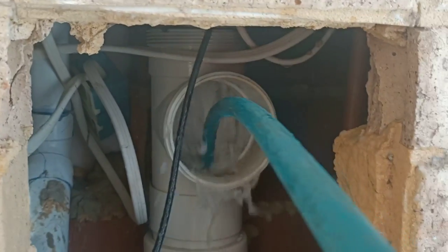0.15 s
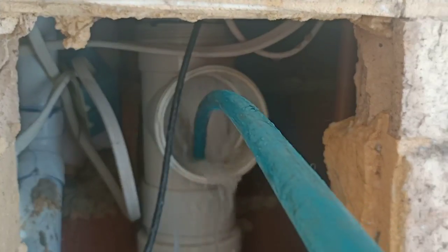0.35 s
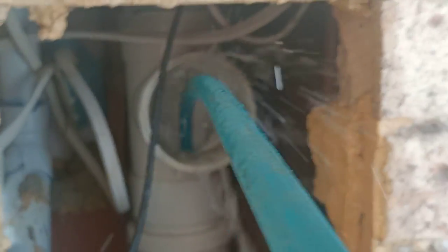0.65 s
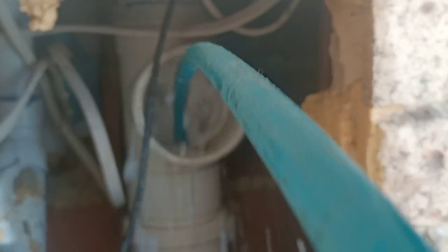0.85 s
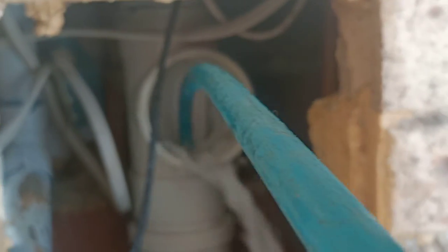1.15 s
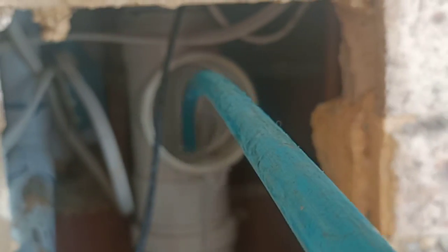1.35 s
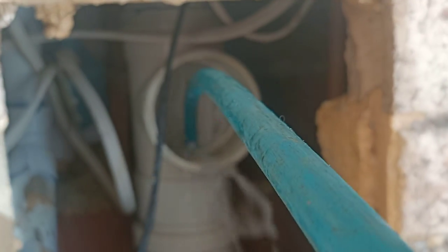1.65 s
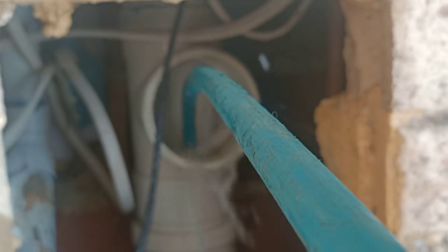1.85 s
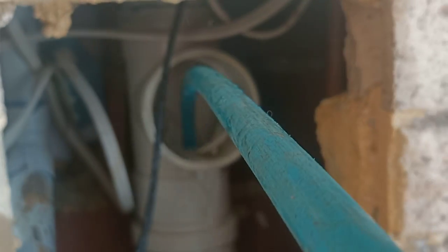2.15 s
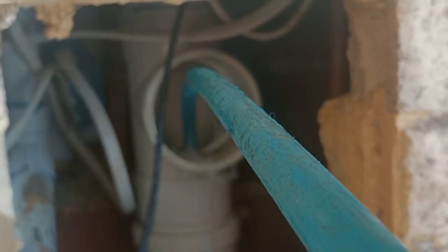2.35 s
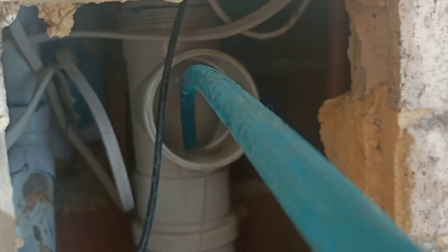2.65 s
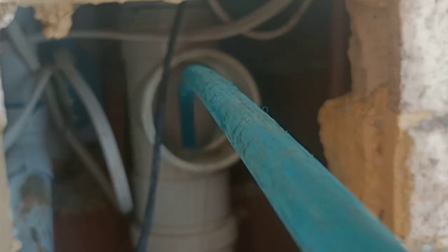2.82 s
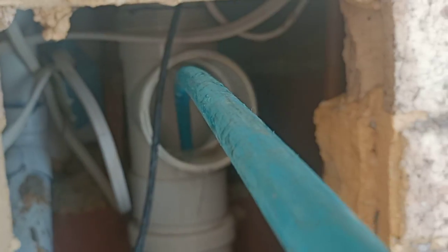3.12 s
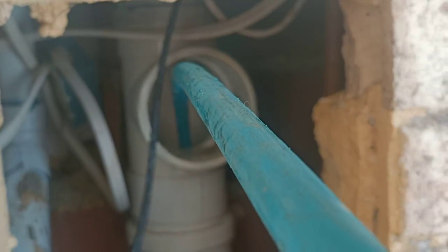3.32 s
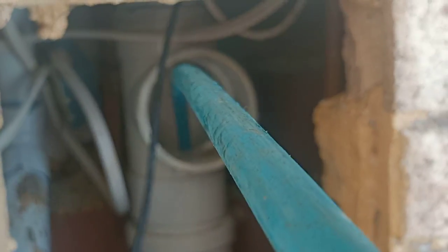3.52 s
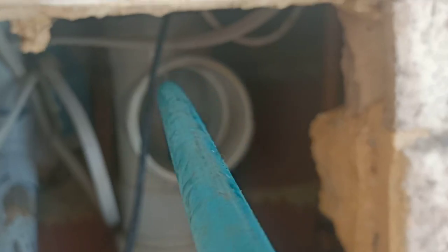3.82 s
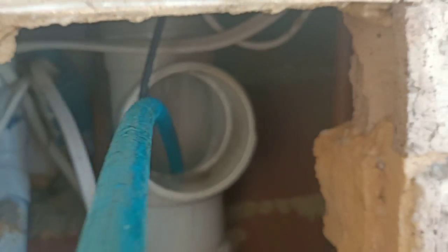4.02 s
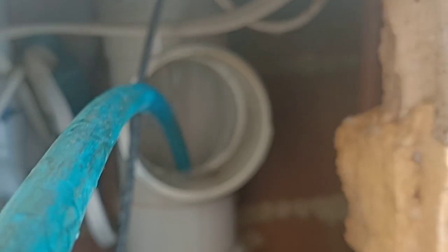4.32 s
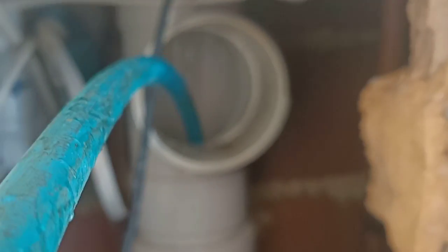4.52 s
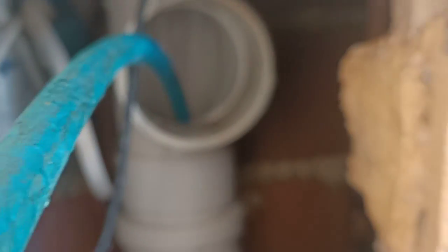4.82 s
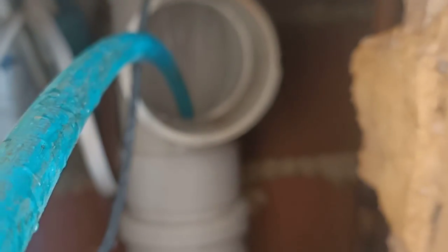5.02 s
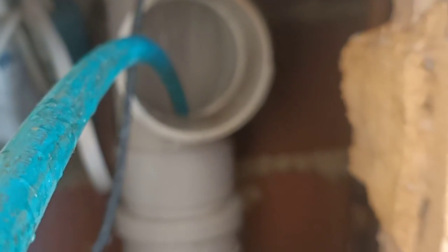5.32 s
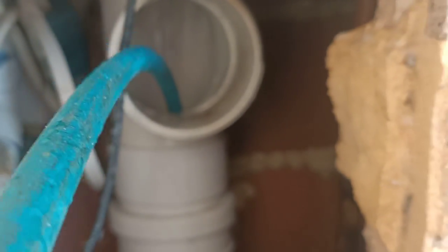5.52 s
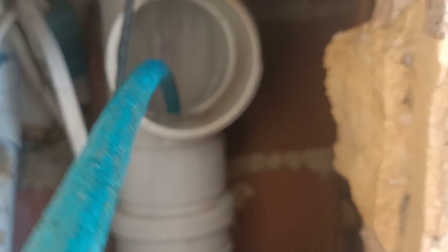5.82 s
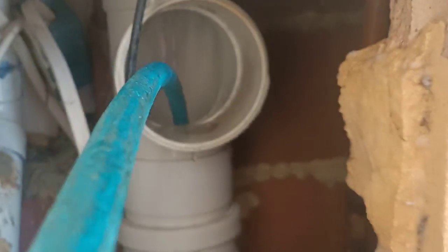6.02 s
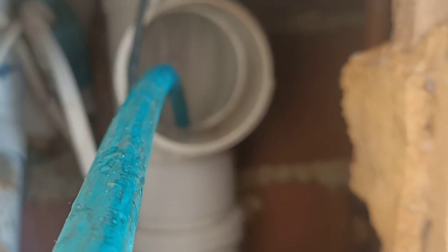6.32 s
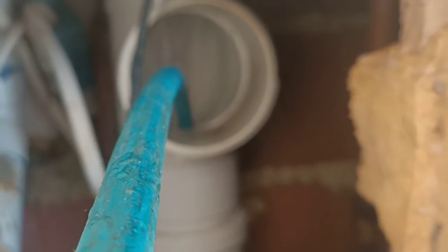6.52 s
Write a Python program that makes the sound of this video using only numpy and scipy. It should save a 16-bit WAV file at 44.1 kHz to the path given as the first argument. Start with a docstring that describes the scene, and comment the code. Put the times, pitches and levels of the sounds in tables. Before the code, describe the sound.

Heard close in stereo inside a cramped wall hatch, with dense short echoes. From 0 s, water gushes loudly from an open plastic pipe, hollow and ringing, with rapid bubbles, rising glugs, low slopping thuds and crisp spray; a strong burst comes near 1.1 s. From about 1.5 s it weakens, breaking into a thin sputtering trickle by 3 s. From 3.2 to 4.4 s only faint drips, ticks and small hose knocks remain over a distant low pump hum and room noise; a sharper knock and tick land at 4.07 s. From 4.4 to 5 s the wet hose rubs and scuffs grainily on the rim. At 5.05 s trapped air abruptly blasts out, a bright strong hiss with a breathy whistle sweeping upward around 5.4 s, then easing by 5.7 s. Water surges back from 5.6 s with a thud at 5.77 s, full and gurgling by 6 s, still running at the end, about 6.65 s.

```python
"""Jetting hose in a drain pipe

Inside a wall hatch, gushing water (filtered noise and ringing bubbles) dies away to drips in an open plastic pipe.
The hose knocks (damped rings) and rubs on the rim (grainy noise); trapped air blasts out as hiss with a whistle
(noise on a gliding pitch), then the water surges back. A far pump engine hums below (wavering sines) over room
noise. Two microphone ports hear it all, with close echoes and the ring of the hatch."""
import sys
import numpy as np
from scipy import signal
from scipy.fft import rfft, irfft
from scipy.io import wavfile

SR = 44100
rng = np.random.default_rng(int(sys.argv[2]) if len(sys.argv) > 2 else 0)


def nominal_scale(level):
    """Amplitude ratio for a level in decibels (scalar or array-like)."""
    x = np.asarray(level, float) / 20
    return 10 ** x


def inscribe(sig):
    """Save sig as 16-bit PCM at rate SR to the path in sys.argv[1].

    A 1-D sig is mono; a 2-D sig holds one channel per row.
    Samples are clipped to [-1, 1] before scaling.
    """
    pcm = np.round(np.clip(np.atleast_2d(sig).T, -1, 1) * 32767)
    wavfile.write(sys.argv[1], SR, pcm.astype(np.int16))


N = 293706

# likeness of the ports for rubbing and background: (frequency [Hz], left-right likeness, below 0 taken as 0)
FAR_LIKENESS = [(60, 0.85), (240, 0.83), (950, -0.74), (3750, 0.11), (14900, -0.1)]


def rms_one(x):
    """Scale to rms 1."""
    return x / np.sqrt(np.mean(x ** 2) + 1e-20)


def in_time(rows):
    """Sample span of a table and its columns over that span."""
    s, *columns = np.transpose(rows)
    span = slice(round(s[0] * SR), min(round(s[-1] * SR), N))
    return [span] + [np.interp(np.arange(N)[span] / SR, s, column) for column in columns]


def at_hz(points, hz):
    """Read a spectrum on a log-frequency axis."""
    point_hz, values = np.array(points).T
    return np.interp(np.log(hz), np.log(point_hz), values)


def left_right(pan_db):
    """Gains of the two ports; positive favours the left."""
    return nominal_scale(pan_db * np.array([[.5], [-.5]]))


def drift(rate, size):
    """Slow random wander of spread 1: noise through two equal low-pass poles at rate [Hz]."""
    r = np.exp(-80 * np.pi * rate / SR)   # computed at every 40th sample
    noise = rng.standard_normal(size // 40 + 1002)
    slow = signal.lfilter([1], [1, -2 * r, r * r], noise)[1000:]
    return np.interp(np.arange(size) / 40, np.arange(len(slow)), rms_one(slow - slow.mean()))


def pair(size, alike):
    """Two noises that share a part: alike 0 is independent, 1 identical."""
    mid, side = rng.standard_normal((2, size))
    alike = np.clip(alike, 0, 1)
    return np.sqrt(1 + alike) * mid + np.sqrt(1 - alike) * side * [[1], [-1]]


def band_pass(x, edges_hz):
    """Keep the noise between two frequencies."""
    return signal.sosfilt(signal.butter(2, edges_hz, "band", fs=SR, output="sos"), x)


def above(x, edge_hz):
    """Steep high-pass."""
    return signal.sosfilt(signal.butter(6, edge_hz, "high", fs=SR, output="sos"), x)


def bands(spectrum, likeness, size, patchy_db, rate, tilt_db=0):
    """About third-octave bands of stereo noise, flickering together and alone; tilt in dB per octave; rms 1."""
    low, high = spectrum[0][0], spectrum[-1][0]
    edges = np.geomspace(low, high, int(3 * np.log2(high / low)) + 2)
    out, together = 0, drift(rate, size)
    for a, b in zip(edges, edges[1:]):
        hz = np.sqrt(a * b)
        band = band_pass(pair(size, at_hz(likeness, hz)), [a, b])
        level_db = at_hz(spectrum, hz) + patchy_db * (0.63 * together + 0.8 * drift(rate, size))
        out = out + band * nominal_scale(level_db + tilt_db * np.log2(hz / np.sqrt(low * high)))
    return rms_one(out)


def resonances(modes, likeness, size, patchy_db, rate, fall_db=0):
    """Noise sung through each resonance, each swelling on its own; a falling flow shifts their balance; rms 1."""
    out, power = 0, 0
    for hz, width, level_db, *gain in modes:
        r = np.exp(-np.pi * width / SR)
        poles = [1, -2 * r * np.cos(2 * np.pi * hz / SR), r * r]
        sung = signal.lfilter([1 - r, 0, r - 1], poles, pair(size, at_hz(likeness, hz)))
        strength = nominal_scale(level_db + sum(gain) * fall_db)
        out = out + sung * strength * nominal_scale(patchy_db * drift(rate, size))
        power = power + width * strength ** 2
    return rms_one(out / np.sqrt(power))


def bubbles(per_s, low_hz, high_hz, cycles, size, spread_db):
    """Random bubbles, each a little to one side, dying by 60 dB in the given cycles; rms 1."""
    out = np.zeros((2, size))
    born = rng.random(size) < per_s * nominal_scale(4.0 * drift(12.0, size)) / SR   # they come in clusters
    strength_db = spread_db * np.minimum(rng.exponential(1, size), 4)
    kicks = born * nominal_scale(strength_db) * rng.choice([-1, 1], size)
    sides = nominal_scale(2.46 * rng.standard_normal(size) * [[1], [-1]])
    dealt = rng.integers(0, 14, size)   # which of 14 pitches each bubble takes
    for k, hz in enumerate(np.geomspace(low_hz, high_hz, num=14)):
        r, w = nominal_scale(-60 * hz / (cycles * SR)), 2 * np.pi * hz / SR
        chosen = kicks * sides * (dealt == k) + 1e-18
        out += signal.lfilter([0, np.sin(w)], [1, -2 * r * np.cos(w), r * r], chosen)
    return rms_one(out)


def swells(rows, span, rise_s, fall_s):
    """Each event lifts a level by its dB, rising to its moment and falling after it."""
    s, *lifts = np.transpose(rows)
    after = np.arange(N)[span][::32, None] / SR - s
    shape = np.exp(-.5 * (after / np.where(after < 0, rise_s, fall_s)) ** 2)
    return [np.repeat(shape @ lift, 32)[:span.stop - span.start] for lift in lifts]


def add(out, s, peak_db, hz, t60, pan_db, attack_s, rise=0):
    """Add one damped ring; over its t60 its pitch climbs by twice the share rise."""
    t = np.arange(int(abs(t60) * SR)) / SR
    shape = nominal_scale(-60 * t / t60) * (1 - np.exp(-t / attack_s))
    ring = shape / shape.max() * np.sin(2 * np.pi * hz * (t + rise * t * t / t60))
    at = round(s * SR)
    out[:, at:at + len(t)] += (ring * nominal_scale(peak_db) * left_right(pan_db))[:, :N - at]


def ports(x, lead):
    """Sound reaches the two ports by different paths: the phase between them varies with pitch."""
    turn = np.interp(np.arange(N // 2 + 1) * SR / N, *np.transpose(lead))
    return irfft(rfft(x) * np.exp(.5j * turn * [[1], [-1]]), N)


def water(rows, gush_colour, gurgle_colour, spray_colour, pipe, rumble_db):
    """Turbulent gush through the pipe's air column, with bubbles, gurgle, wall rumble and fine spray."""
    # likeness of the ports for water: (frequency [Hz], left-right likeness)
    likeness = [(60, 1), (180, 1), (540, 0.99), (1000, 0.82), (1600, 0.72), (2800, 0.78), (4940, 0.4),
                (14900, .4)]
    # slugs of water bursting past the hose: (time [s], gush swell [dB])
    slugs = [(0.015, 3), (0.14, 3.5), (0.42, 2.5), (0.59, 3), (0.65, 3), (0.76, 1.5), (0.87, 2), (0.92, 0),
             (1.092, 8.5), (1.15, 4), (1.255, 4.5), (1.315, 6), (1.54, -0.5), (1.99, -1.5), (2.23, 4.5),
             (2.85, 3.5), (2.89, 4.5), (2.94, 2.5), (3.33, 4), (3.54, 4), (3.72, 0.5), (3.865, 3),
             (4.065, -4), (6.03, 2), (6.09, 2), (6.17, 1.5), (6.25, 0.5), (6.62, 1)]
    # water slopping against the pipe wall: (time [s], gurgle swell [dB], further rumble swell [dB])
    slops = [(0.06, -2.5, -8), (0.27, -2, 9), (0.35, 4.5, 13.5), (0.52, -7, -0.5), (0.56, 7.5, 12.5),
             (0.68, -3, 4), (0.78, 5, 3), (0.86, -1, 2), (0.93, -9, 9), (1.0, 2, 6), (1.07, 0, 3),
             (1.27, 6.5, 3), (1.39, 8, -7), (1.55, 3, 2), (1.86, 6.5, 6), (2.0, -5, -3.5), (2.06, -7, -2),
             (2.24, 7, 2), (2.33, 5, 3), (2.48, 1.5, 4), (3.54, -3, -5), (3.68, 3, 24), (3.84, 0, 6),
             (5.77, 4.5, 15.5), (6.08, 2.5, -2), (6.18, 1.5, 7), (6.32, -2, 7), (6.63, 6, 18)]
    # sheets of spray thrown out of the mouth: (time [s], spray swell [dB])
    splashes = [(0.27, 4.5), (0.37, 7.5), (0.47, 5.5), (0.555, 7.5), (0.69, 4), (0.87, 4), (1.1, 2),
                (1.2, 1), (1.7, 0.5), (1.86, 0.5), (2.24, 4), (2.5, 1.5), (2.93, 3), (3.3, 5), (5.6, 4),
                (5.74, 6.5), (5.8, 4), (6.24, 3)]
    # low air-column modes that emerge as the pipe empties:
    # (frequency [Hz], width [Hz], relative level [dB], gain per fall of the flow [dB/dB])
    deep_pipe = [(261, 12, -14, 1.5), (346, 22, -7.5, 0.9), (366, 60, -14.5, -0.15), (468, 46, -16.5, 1),
                 (605, 80, -8, 0.5)]
    # colour of the wall rumble: (frequency [Hz], relative density [dB per Hz])
    rumble_colour = [(24, -45.5), (40, 9), (59, -18), (92, -0.5), (118, 11.5), (162, -10), (200, -36),
                     (260, -52), (440, -120)]

    span, flow_db, bright_db, low_db = in_time(rows)
    out, n = np.zeros((2, N)), len(flow_db)
    slug_db, = swells(slugs, span, rise_s=.008, fall_s=.04)
    slop_db, thud_db = swells(slops, span, rise_s=0.041, fall_s=0.022)
    splash_db, = swells(splashes, span, rise_s=0.036, fall_s=0.023)
    thin = np.clip((-49 - flow_db) / 8, 0, 1)   # a trickle below -49 dB breaks up
    sputter_db = 4 * thin * drift(20.0, n)
    gush_db = flow_db + slug_db + sputter_db
    bright_db = bright_db + 0.38 * splash_db
    spray_db = -23.5 + 0.65 * flow_db + splash_db + sputter_db   # spray follows part of the flow's swing
    fall_db = np.minimum(flow_db.max() - 10.0 - gush_db, 30)   # a thinner flow lets the air column sing

    tilt_db = 2.44 * (bright_db - bright_db.mean())
    gush = bands(gush_colour, likeness, n, patchy_db=3.0, rate=29.0, tilt_db=tilt_db)
    column = resonances(pipe, likeness, n, patchy_db=3.5, rate=17.0, fall_db=fall_db)
    gush += nominal_scale(-2.0 + 0.16 * fall_db) * column
    gush += nominal_scale(-17.5) * bubbles(250, 950, 3980, 48.0, n, spread_db=5.5)
    gush += nominal_scale(-14.5) * bubbles(700, 1500, 4600, 10.0, n, spread_db=4.5)   # spatter

    gurgle = bands(gurgle_colour, likeness, n, patchy_db=3.0, rate=22.0)
    deep = resonances(deep_pipe, likeness, n, patchy_db=-1.0, rate=3.9, fall_db=fall_db)
    gurgle += nominal_scale(-0.5 + 0.36 * fall_db) * deep

    rumble = bands(rumble_colour, likeness, n, patchy_db=1.0, rate=31.0, tilt_db=-0.12 * fall_db)
    rumble = above(rumble, 58)

    dulling_db = -.1 * np.maximum(fall_db, 0)   # spray dulls as the flow falls
    spray = bands(spray_colour, likeness, n, patchy_db=1.95, rate=28.0, tilt_db=dulling_db)
    spray += nominal_scale(-12) * bubbles(400, 5000, 13000, 1.9, n, spread_db=3.5)

    out[:, span] = (nominal_scale(gush_db) * rms_one(gush) + nominal_scale(low_db + slop_db) * rms_one(gurgle)
                    + nominal_scale(low_db + rumble_db + thud_db) * rumble + nominal_scale(spray_db) * rms_one(spray))
    return out


def draining_water():
    """The gush thins to a trickle, and the emptying pipe changes the balance of its resonances."""
    # course of the flow: (time [s], flow as gush level [dB], brightness [dB, about its mean], gurgle level [dB])
    course = [(0.0, -17.5, -7.5, -19.5), (0.12, -14.5, -3.5, -30.5), (0.3, -14.5, -3, -38.5),
              (0.55, -15, -3.5, -31), (0.9, -12.5, 0, -39.5), (1.08, -20, -2, -40),
              (1.22, -20.5, -4, -42.5), (1.45, -20, -5.5, -32), (1.7, -22.5, -4, -40.5),
              (2.05, -26.5, -4, -34), (2.3, -32, -4.5, -41), (2.52, -32.5, -2, -38.5),
              (2.77, -40, -1, -49.5), (2.92, -42, 0.5, -52), (3.16, -46, -2.5, -63.5),
              (3.45, -53.5, -2, -66.5), (3.8, -59, -2, -68.5), (4.1, -63.5, 1.5, -68),
              (4.38, -67.5, 3.5, -76.5)]
    # air column while draining:
    # (frequency [Hz], width [Hz], relative level [dB], gain per fall of the flow [dB/dB])
    pipe = [(955, 80, -7.5, -0.55), (1018, 22.6, 4, -0.3), (1240, 51, 3.5, -0.07), (1346, 87, -3.5, 0),
            (1780, 66, -2, -0.25), (2000, 75, -0.5, 0.12), (2580, 210, -4, -0.45), (2845, 71, 1, 0),
            (3230, 250, -20, 1.04), (3675, 140, -10, 0.4), (4125, 120, -11.5, 0.54)]
    # colours of gush, gurgle and spray: (frequency [Hz], relative density [dB per Hz])
    gush_colour = [(470, -44), (800, -17), (979, -2), (1140, -13.5), (1250, -0.5), (1560, -3), (2860, 2.5),
                   (3480, 3), (4800, -19), (6240, -50.5), (10600, -120)]
    gurgle_colour = [(120, -41), (210, -23.5), (409, 2), (441, -1), (548, 4.5), (850, -5.5), (1100, -32),
                     (1870, -120)]
    spray_colour = [(2710, -32), (4600, -6), (5090, -11), (6290, -4), (7350, -7), (8460, 1), (8990, -12.5),
                    (13400, -20.5), (15300, -19.5)]
    # phase by which the left port leads: (frequency [Hz], phase [rad])
    lead = [(0, 0), (690, 0.6), (1210, -0.5), (1980, 0.0), (3010, -0.2), (3700, -5.6), (4390, -5.7),
            (5170, -7.0), (6120, -11.6), (9730, -24.3), (10300, -25.1), (12600, -25.6), (14200, -31.3),
            (15100, -30.9)]
    return ports(water(course, gush_colour, gurgle_colour, spray_colour, pipe, rumble_db=-4.5), lead)


def background():
    """Far pump engine: its orders are sines wavering a little in level and phase, over room noise."""
    # engine orders: (frequency [Hz], level [dB rms])
    orders = [(48.4, -57.5), (72.6, -56.5)]
    # colour of the room noise: (frequency [Hz], relative density [dB per Hz])
    room_colour = [(15, -44), (25, -5.5), (69, -14.5), (147, -2), (273, -17), (455, -16), (718, -14.5),
                   (1050, -18), (4000, -22.5), (4830, -26.5), (8500, -30), (13100, -32.5), (15300, -60.5)]
    t = np.arange(N) / SR
    hum = 0
    for hz, level_db in orders:
        level = np.sqrt(2) * nominal_scale(level_db + 1.2 * drift(4.0, N))
        hum = hum + level * np.sin(2 * np.pi * hz * t + 0.69 * drift(0.97, N))
    return hum + nominal_scale(-54.5) * bands(room_colour, FAR_LIKENESS, N, patchy_db=-1.0, rate=6.0)


def glugs():
    """Large bubbles: damped rings that climb in pitch."""
    # large bubbles: (time [s], peak before a 6.5 dB cut [dB], starting pitch [Hz])
    large = [(0.0912, -8.5, 2520), (0.1294, -4.5, 962), (0.19, -6, 2790), (0.2462, -8, 1240),
             (0.2888, -3.5, 2690), (0.357, -5, 2786), (0.5782, -7, 1234), (0.6302, -3, 2370),
             (0.733, -8, 2750), (0.803, -11, 2760), (0.8703, -4.5, 2520), (0.9986, -12, 2990),
             (1.044, -12.5, 2530), (1.0929, 0.5, 2100), (1.158, -6, 1620), (1.2804, -18, 1260),
             (1.33, 0, 1240), (1.508, -23.5, 1240), (1.6, -14, 2370), (1.731, -17, 2730),
             (1.7811, -10.5, 1233)]
    out = np.zeros((2, N))
    for s, peak_db, hz in large:
        add(out, s, peak_db - 6.5, hz, t60=0.04, pan_db=1.2, attack_s=0.006, rise=0.088)
    return out


def ticks():
    """Droplets and ticks: short treble rings, with two higher ones on top."""
    # droplets and ticks: (time [s], peak [dB], pitch [Hz], peak of each top ring [dB], left over right [dB])
    drops = [(1.6992, -19, 8500, -26, 8.5), (1.8358, -25, 5770, -38, -4), (1.97, -33, 6560, -30, -2),
             (2.0964, -32, 6230, -47.5, 2.5), (2.7149, -25, 6190, -36.5, -13),
             (2.8438, -39.5, 5080, -52.5, -7.5), (3.1138, -43, 5660, -36, -4.0),
             (3.2726, -41, 6440, -52.5, 0.0), (3.716, -41, 5110, -65, -0.5), (3.796, -43, 8300, -56, 22),
             (4.0692, -24, 8700, -30.5, 15), (4.2026, -41, 8700, -49, 14.5),
             (4.527, -34, 6960, -53.5, -1.0), (4.5707, -31.5, 6230, -56.5, -14),
             (4.594, -35, 5560, -63.5, -5), (4.6926, -41.5, 6080, -51.5, 1.0),
             (4.7305, -36.5, 8870, -49, 15)]
    out = np.zeros((2, N))
    for s, peak_db, hz, top_db, pan_db in drops:
        add(out, s, peak_db, hz, .003, pan_db, attack_s=0.00022)
        add(out, s, top_db, 10500, .002, pan_db, attack_s=.0002)
        add(out, s, top_db, 13500, .002, -pan_db, attack_s=0.00015)   # leans to the other side
    return out


def drips():
    """Nine faint drips at random moments, each a very short treble ring."""
    out = np.zeros((2, N))
    for when, size, pitch, side in rng.random((9, 4)):
        s = np.interp(when, [0, 1], (3.2, 4.8))
        peak_db, hz, pan_db = -48 + 6 * (size - .5), 5500 + 3000 * pitch, 12 * (side - .5)
        add(out, s, peak_db, hz, .002, pan_db, attack_s=0.00027)
    return out


def knocks():
    """Hose knocking on the pipe: a low ring dying in six cycles, with a two-pitch crack."""
    # knocks: (time [s], peak [dB], pitch [Hz], peak of the lower crack [dB], left over right [dB])
    blows = [(3.462, -43, 270, -58, 5), (3.582, -44.5, 108, -65, 23), (3.672, -39.5, 172, -60, 22),
             (3.797, -42.5, 900, -59, 18), (4.0692, -29.5, 329, -33, -12), (4.31, -39.5, 520, -50, 14),
             (4.412, -42, 423, -53, 5), (4.641, -38, 493, -58, 14), (4.691, -33.5, 390, -57, -2),
             (5.77, -30, 192, -60, 2)]
    out = np.zeros((2, N))
    for s, peak_db, hz, crack_db, pan_db in blows:
        add(out, s, peak_db, hz, 6.0 / hz, pan_db, attack_s=0.00054)
        add(out, s, crack_db - 7, 4300, .004, pan_db, attack_s=.0003)
        add(out, s, crack_db, 1850, .007, pan_db, attack_s=0.00037)
    return out


def rubbing():
    """Wet hose dragged over the rim: grainy noise in clumps."""
    # course of the rub: (time [s], level [dB], treble [dB, about its mean])
    course = [(4.385, -46, -18), (4.553, -47, -7.5), (4.651, -45.5, -14.5), (4.837, -49.5, -8),
              (5.03, -64.5, -27.5)]
    # colour of the rub: (frequency [Hz], relative density [dB per Hz])
    colour = [(71, -29), (120, -9), (389, -3), (467, -20), (1550, -9.5), (1900, -17), (3090, -13),
              (5020, -30), (6280, -24.5), (15300, -43)]
    span, level_db, treble_db = in_time(course)
    out, n = np.zeros((2, N)), len(level_db)
    tilt_db = 0.34 * (treble_db - treble_db.mean())
    out[:, span] = nominal_scale(level_db) * bands(colour, FAR_LIKENESS, n, patchy_db=4.5, rate=32.0, tilt_db=tilt_db)
    return out


def scuffs():
    """Hose slipping on the rim: each slip is a sudden puff of noise that dies, low and treble apart."""
    # slips: (time [s], starting level [dB], starting treble level [dB], left over right [dB])
    slips = [(4.395, -37.5, -65.5, 1.5), (4.49, -56, -53.5, -2.5), (4.525, -40, -52, -3.5),
             (4.543, -44, -57, 2.0), (4.569, -45, -49, 1), (4.592, -41.5, -60, -2.5),
             (4.691, -47, -57, -0.5), (4.711, -48, -53.5, 3), (4.73, -47, -54, 1.0), (4.77, -47, -49.5, -3),
             (4.83, -43, -55, -3)]
    t, out = np.arange(int(.12 * SR)) / SR, np.zeros((2, N))
    for s, peak_db, treble_db, pan_db in slips:
        puff = 0
        for edges_hz, level_db in (([350, 4200], peak_db), ([4500, 13000], treble_db)):
            noise = band_pass(pair(len(t), 0.23), edges_hz)
            puff = puff + rms_one(noise) * nominal_scale(level_db - 60 * t / 0.069)   # 60 dB down in 0.069 s
        at = round(s * SR)
        out[:, at:at + len(t)] += puff * left_right(pan_db)
    return out


def blast():
    """Air forced out: hiss through the pipe, hiss of the jet, a narrow slit tone to the left and top hiss."""
    # course of the blast: (time [s], pressure [dB], opening [0-1])
    course = [(5.035, -53, .95), (5.053, -2, 0.64), (5.075, 0, 0.6), (5.11, 1.2, 0.8), (5.34, 0.7, .95),
              (5.39, 2.5, .5), (5.415, -1.5, .05), (5.535, -0.7, 0), (5.565, -5, 0.2), (5.65, -10.5, 0.8),
              (5.71, -8, .95), (5.8, -24, .95)]
    # pipe hiss, jet hiss, slit tone, top hiss:
    # (level at 0 dB pressure [dB], share of the pressure's swing, gain when the opening is shut [dB])
    layers = [(-31, 1.04, -0.8), (-26.5, 1.7, -12), (-27.5, 1.53, 5.5), (-27, 1.15, 0.2)]
    # colours in the pipe, at the jet and at the top: (frequency [Hz], relative density [dB per Hz])
    low_colour = [(250, -23.5), (390, -9), (700, -23), (920, -18), (1200, -18.5), (2200, 0), (2600, -19),
                  (3300, 3)]
    jet_colour = [(3500, -3.5), (4200, -3), (5000, 14), (6200, -2.5)]
    top_colour = [(7000, 10), (9500, -3), (11500, -5), (12400, -5), (14000, -6.5), (15300, -20)]
    # pipe and slit resonances: (frequency [Hz], width [Hz], relative level [dB])
    pipe_modes = [(435, 50, -11.5), (900, 41, 0), (960, 22, 3), (1483, 67, -5), (2030, 53, -11),
                  (2170, 52, -0.5), (3310, 48, -2)]
    slit_modes = [(8200, 90, -0.5), (8500, 450, -9), (8920, 300, -13.5), (12850, 200, -28)]
    # likeness of the ports for air: (frequency [Hz], left-right likeness)
    likeness = [(240, .7), (950, .6), (2500, .7), (3600, .98), (5000, .9), (8000, .75), (14900, .4)]

    span, pressure_db, opening = in_time(course)
    out, n = np.zeros((2, N)), len(opening)
    narrow = 1 - np.clip(opening, 0, 1)
    pipe_db, jet_db, slit_db, top_db = [level_db + share * pressure_db + narrow_db * narrow
                                        for level_db, share, narrow_db in layers]
    pipe = bands(low_colour, likeness, n, patchy_db=3.5, rate=18.0)
    pipe += nominal_scale(4.5) * resonances(pipe_modes, likeness, n, patchy_db=-2.8, rate=9.3)
    pipe = rms_one(pipe) * left_right(-3.0)
    jet = bands(jet_colour, likeness, n, patchy_db=2.5, rate=21.0)
    slit = above(resonances(slit_modes, likeness, n, patchy_db=0.7, rate=18.0), 5300) * nominal_scale([[2.5], [-3.5]])
    top = above(bands(top_colour, likeness, n, patchy_db=1.5, rate=23.0), 6000) * left_right(-5.0)
    fade = np.minimum(np.arange(n)[::-1] / (.04 * SR), 1)
    out[:, span] = fade * (nominal_scale(pipe_db) * pipe + nominal_scale(jet_db) * jet + nominal_scale(slit_db) * slit + nominal_scale(top_db) * top)
    return out


def whistle():
    """A band of noise carried on the moving nozzle pitch; it climbs as the opening narrows."""
    # nozzle whistle: (time [s], centre [Hz], level before a tilt of 1.5 dB to the right [dB])
    course = [(5.04, 6600, -58.5), (5.055, 6740, -21), (5.16, 6900, -20.5), (5.34, 6660, -18.5),
              (5.385, 8500, -18), (5.42, 10820, -24.5), (5.45, 10600, -66), (5.67, 5720, -42),
              (5.72, 6060, -30), (5.82, 5530, -35), (5.92, 6140, -50)]
    width_hz, slow_hz = 1200, 500
    span, hz, level_db = in_time(course)
    out, n = np.zeros((2, N)), len(hz)
    low_pass = signal.butter(4, slow_hz, fs=SR, output="sos")
    slow = signal.sosfilt(low_pass, np.array([pair(2 * n, .75), pair(2 * n, .75)]))
    read = np.arange(n) * width_hz / (2 * slow_hz)   # read faster, the noise widens to the full width
    real, imag = [[np.interp(read, np.arange(2 * n), v) for v in part] for part in rms_one(slow)]
    turn = 2 * np.pi * np.cumsum(hz) / SR
    carried = real * np.cos(turn) + imag * np.sin(turn)
    out[:, span] = carried * nominal_scale(level_db + 0.5 * drift(5.2, n)) * left_right(-3.0)
    return out


def escaping_air():
    """Blast and whistle, reaching the two ports by different paths."""
    # phase by which the left port leads: (frequency [Hz], phase [rad])
    lead = [(0, 0), (3010, -0.3), (3790, -3.9), (4650, -11.4), (5000, -9.4), (5770, -14.3), (6200, -10.5),
            (7150, -11.1), (10200, -36.9), (10500, -37.7), (10900, -43.4), (12500, -52.6), (14500, -42.1),
            (15100, -44.6)]
    return ports(blast() + whistle(), lead)


def surging_water():
    """Water surging back into the pipe, with its own air-column resonances."""
    # course of the flow: (time [s], flow as gush level [dB], brightness [dB, about its mean], gurgle level [dB])
    course = [(5.54, -50, 3, -77), (5.67, -33.5, -2.5, -50), (5.74, -28.5, -5.5, -47),
              (5.81, -23.5, -5, -53), (5.9, -20.5, -7.5, -40.5), (5.97, -18, -8, -32.5),
              (6.3, -18.5, -8, -30.5), (6.52, -20.5, -7.5, -31.5), (6.66, -21, -9.5, -41.5)]
    # air column while surging:
    # (frequency [Hz], width [Hz], relative level [dB], gain per fall of the flow [dB/dB])
    pipe = [(1142, 65, -3.5, -0.11), (1482, 110, -6, -0.21), (2034, 120, 4.5, 0.31), (2730, 83, 0, 0.198),
            (3840, 26, -3.5, .1), (4150, 50, -4, .1)]
    # colours of gush, gurgle and spray: (frequency [Hz], relative density [dB per Hz])
    gush_colour = [(470, -49), (800, -11), (1160, 3), (1800, 0.5), (2010, -6), (2320, -10.5), (2820, 6),
                   (4230, -8), (4800, -24), (6240, -52), (10600, -120)]
    gurgle_colour = [(120, -51.5), (200, -29), (241, 6.5), (311, -28.5), (362, -4.5), (850, -8),
                     (1100, -31), (1870, -120)]
    spray_colour = [(2710, -30), (4600, -2.5), (5110, -8.5), (5830, 1.5), (8510, -4), (10400, -12),
                    (13300, -17.5), (15300, -34.5)]
    # phase by which the left port leads: (frequency [Hz], phase [rad])
    lead = [(0, 0), (690, 0.6), (1810, -0.9), (2840, -0.0), (4220, -6.2), (6800, -0.2), (7840, -4.9),
            (8700, 1.9), (10600, 2.8), (11200, 8.6), (11700, 9.3), (12000, 6.3), (13400, 2.8), (15100, 3.2)]
    return ports(water(course, gush_colour, gurgle_colour, spray_colour, pipe, rumble_db=-13.5), lead)


def echoes(x):
    """Dense close reflections between the hatch walls, mostly common to both ports, comb the spectrum finely."""
    t = np.arange(int(.1 * SR)) / SR
    tail = pair(len(t), 0.74) * nominal_scale(-60 * t / 0.058) * (t > .002)   # 60 dB down in 0.058 s
    tail = signal.lfilter([1, -.8], [1, -.5], tail)   # the bass is too long a wave to bounce in so small a space
    tail = nominal_scale(-8.5) * tail / np.sqrt(np.sum(tail ** 2) / 2)
    return x + signal.fftconvolve(x, tail, axes=1)[:, :N]


def hatch(x):
    """Standing waves in the hatch colour the treble of what passes through it."""
    # resonances of the hatch: (frequency [Hz], width [Hz], gain over plain sound [dB], left over right [dB])
    modes = [(4350, 53, 3.5, -5), (5430, 170, -3, -11.5), (5630, 91, 1.5, -13), (5970, 45, 5, -11.5),
             (6200, 74, 4, 0.5), (6770, 80, 4.5, -12), (7060, 87, -6, -19.5), (7120, 76, -3, 0),
             (8140, 36, -4, 32), (8456, 66, 4.5, 8.5), (8200, 55, -3.5, 1.5), (8840, 80, 4, 13),
             (9390, 91, 4.5, 8.5), (10480, 150, 4.5, 12.5), (12700, 190, -9, -33)]
    out = x.copy()
    for hz, width, level_db, pan_db in modes:
        r = np.exp(-np.pi * width / SR)
        poles = [1, -2 * r * np.cos(2 * np.pi * hz / SR), r * r]
        ring = signal.lfilter([(1 - r * r) / 2, 0, (r * r - 1) / 2], poles, x)
        out += ring * (nominal_scale(level_db) * left_right(pan_db) - 1)
    return out


def scene():
    """Water, air and rubbing with echoes, and the background, ring in the hatch; brief sounds stay plain."""
    inside = draining_water() + rubbing() + escaping_air() + surging_water()
    brief = glugs() + ticks() + drips() + knocks() + scuffs()
    return hatch(echoes(inside) + background()) + brief


def top_cut(x):
    """Nothing passes above the cut-off."""
    return signal.sosfilt(signal.butter(12, 15490, fs=SR, output="sos"), x)


def record(dry):
    """The ports favour different bands, the deep bass and the very top fall off, and peaks are rounded."""
    # microphone ports: (frequency [Hz], left over right [dB])
    balance = [(60, 1), (130, -0.5), (290, -1), (640, 3.5), (1400, 2.5), (3080, -0.5), (6770, 2),
               (14900, -7.5)]
    hz = np.arange(N // 2 + 1) * SR / N + 1
    roll_off = np.sqrt((1 + (38 / hz) ** 12) * (1 + (hz / 14600) ** 30))
    heard = irfft(rfft(dry) * left_right(at_hz(balance, hz)) / roll_off, N)
    mix = 1.275 * np.tanh(heard / 1.332)
    return top_cut(mix)


dry = scene()
out = record(dry)
inscribe(out)
```